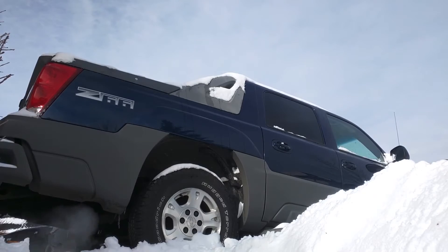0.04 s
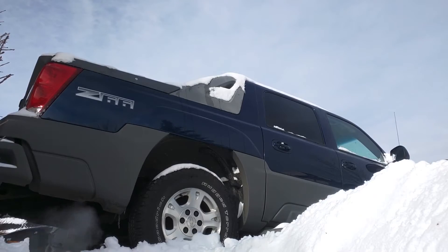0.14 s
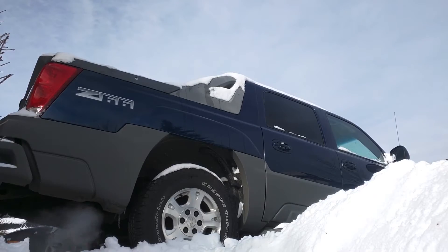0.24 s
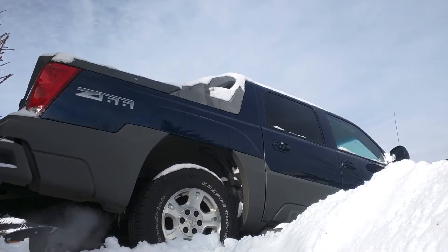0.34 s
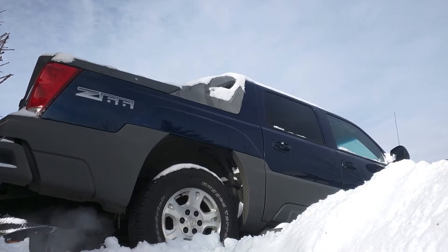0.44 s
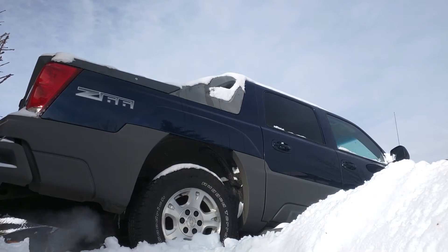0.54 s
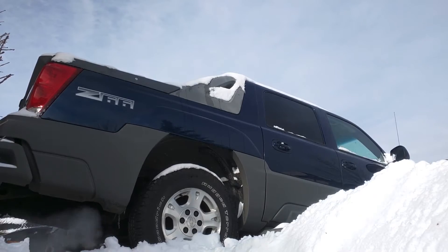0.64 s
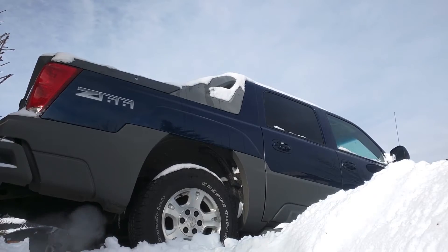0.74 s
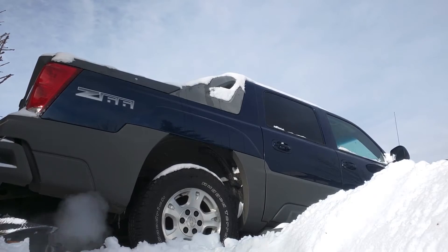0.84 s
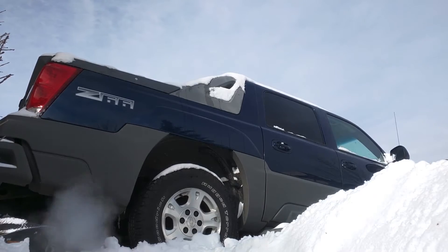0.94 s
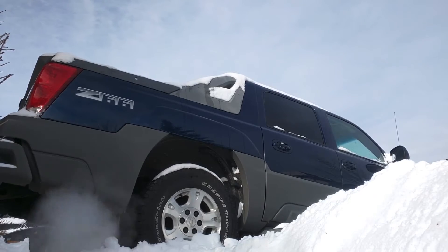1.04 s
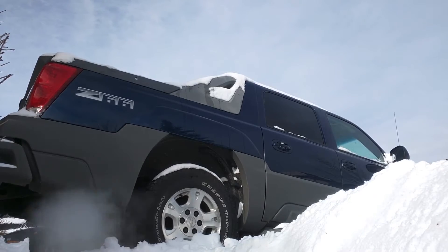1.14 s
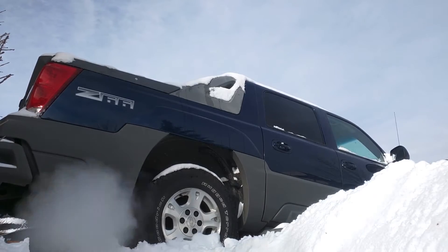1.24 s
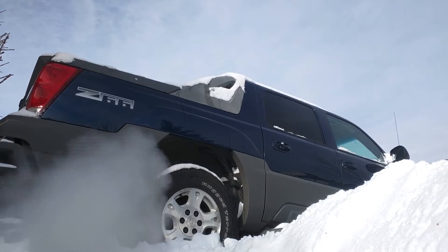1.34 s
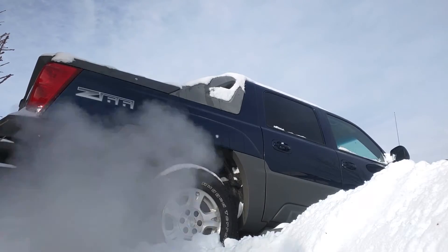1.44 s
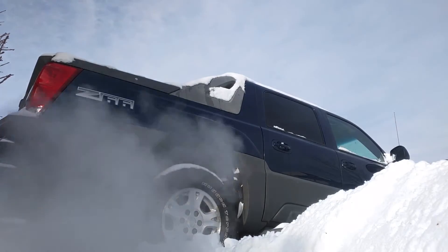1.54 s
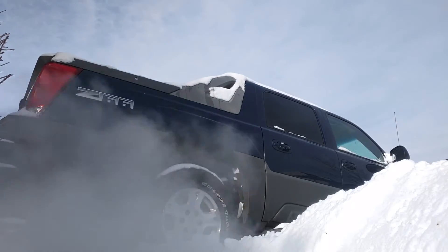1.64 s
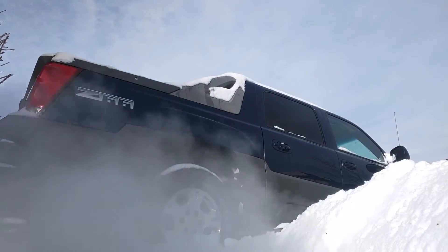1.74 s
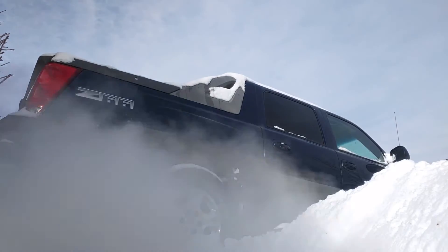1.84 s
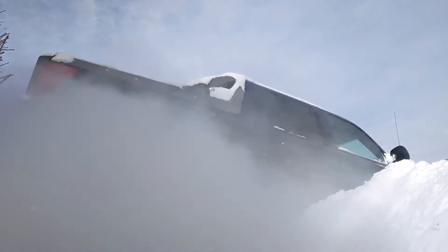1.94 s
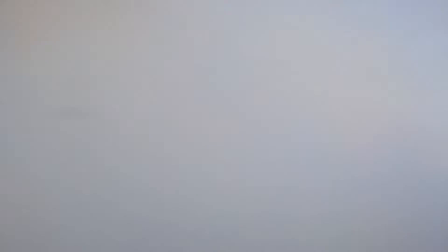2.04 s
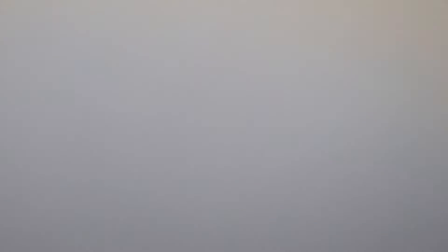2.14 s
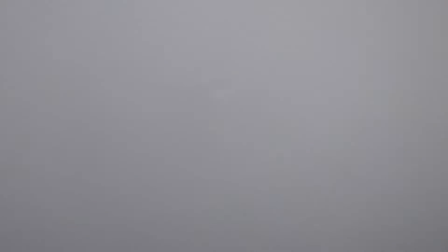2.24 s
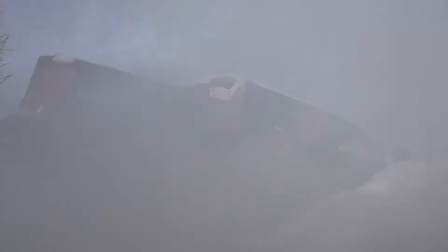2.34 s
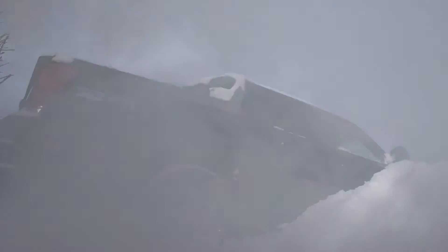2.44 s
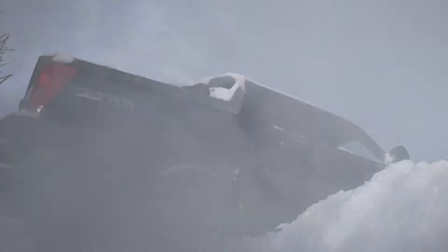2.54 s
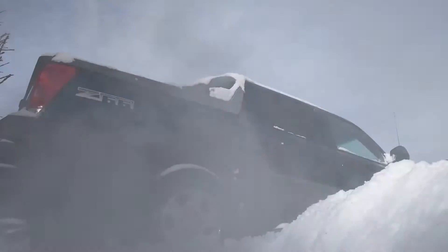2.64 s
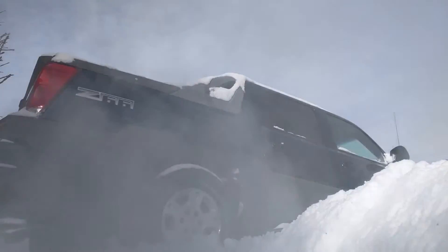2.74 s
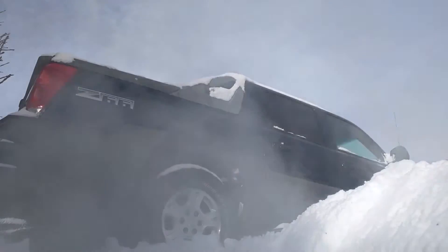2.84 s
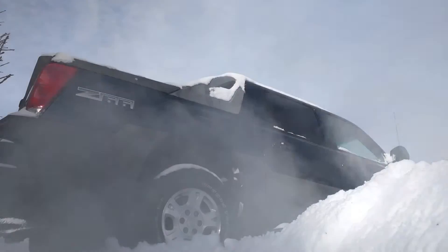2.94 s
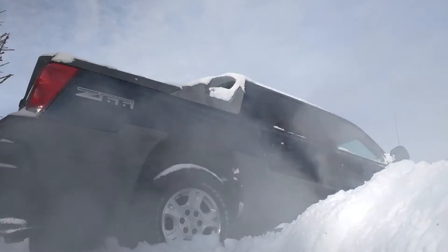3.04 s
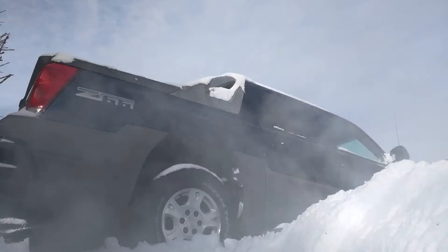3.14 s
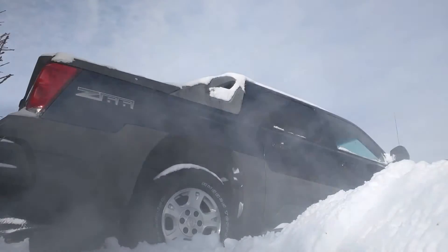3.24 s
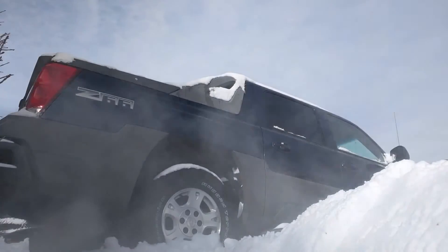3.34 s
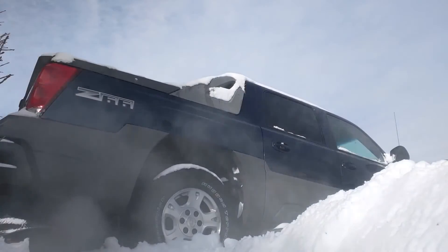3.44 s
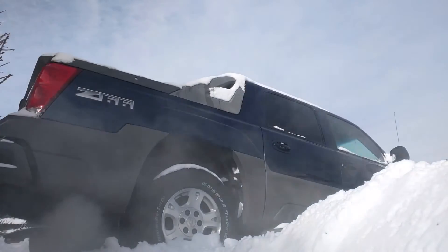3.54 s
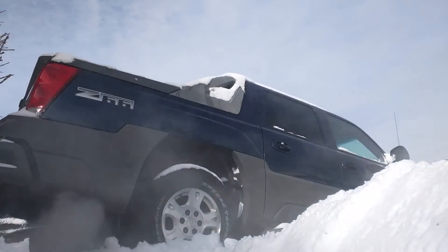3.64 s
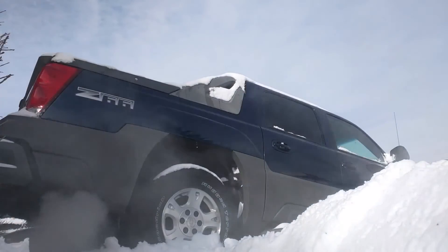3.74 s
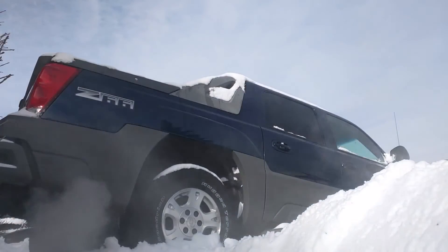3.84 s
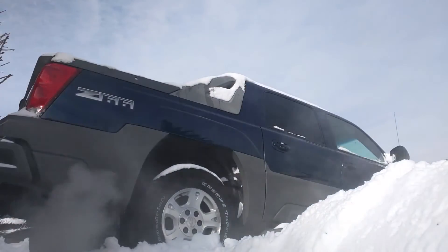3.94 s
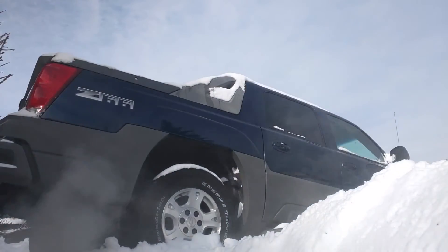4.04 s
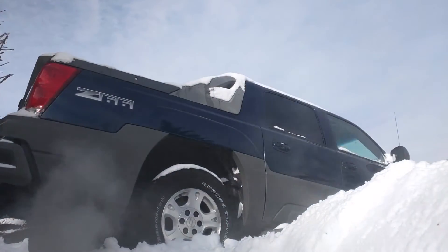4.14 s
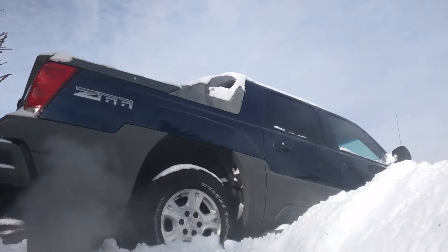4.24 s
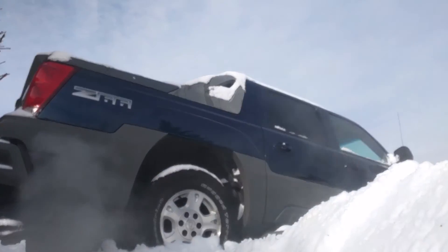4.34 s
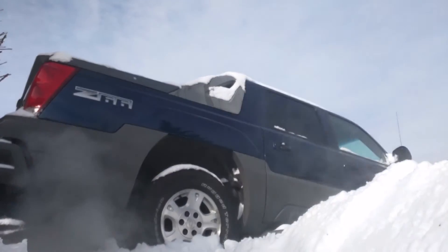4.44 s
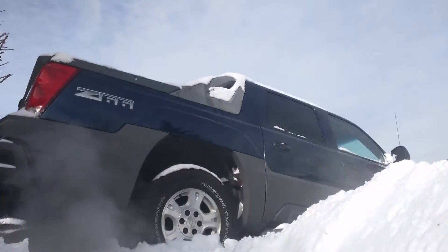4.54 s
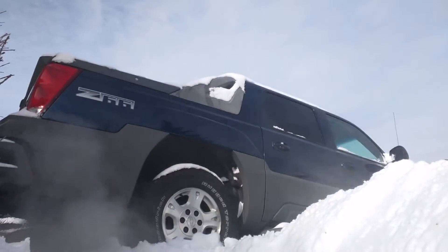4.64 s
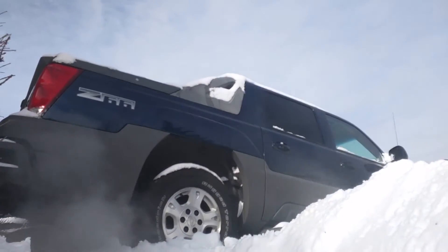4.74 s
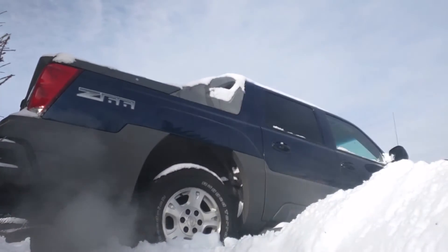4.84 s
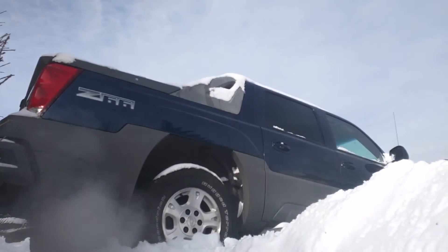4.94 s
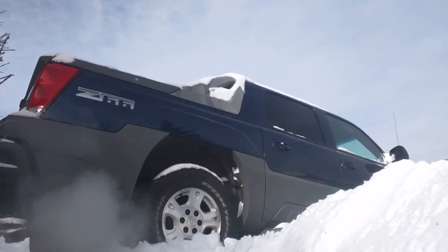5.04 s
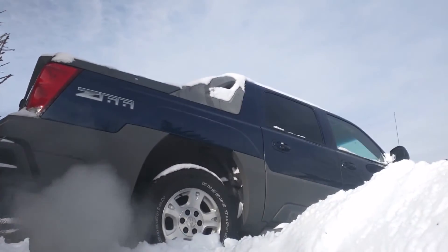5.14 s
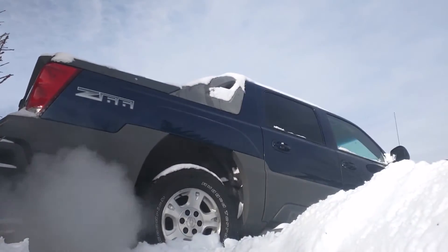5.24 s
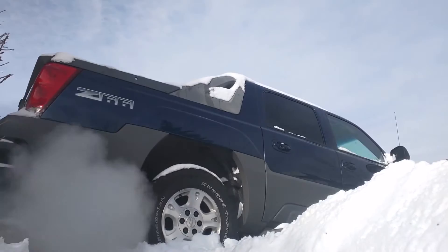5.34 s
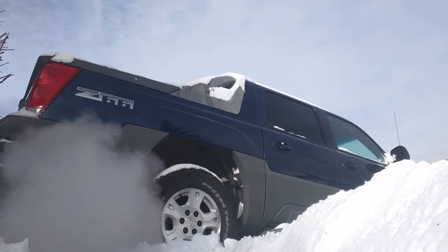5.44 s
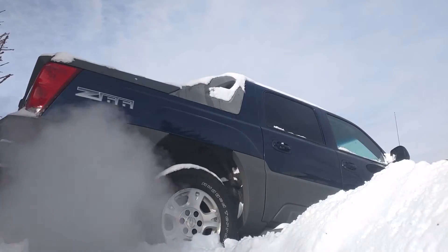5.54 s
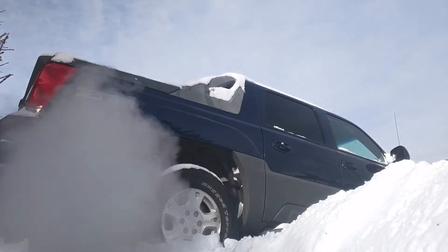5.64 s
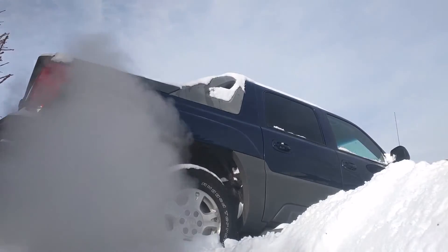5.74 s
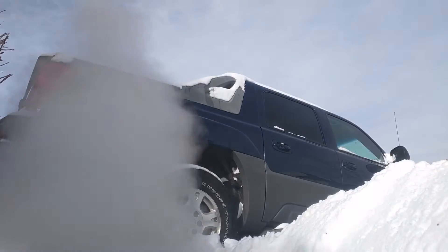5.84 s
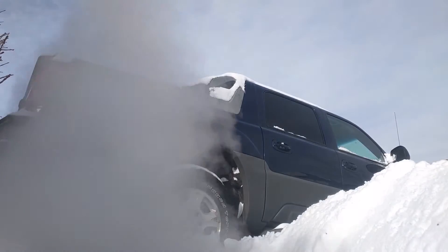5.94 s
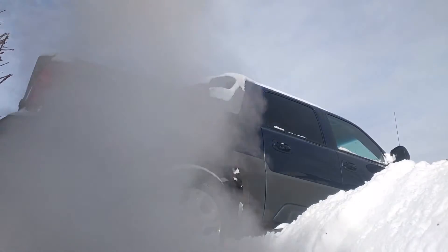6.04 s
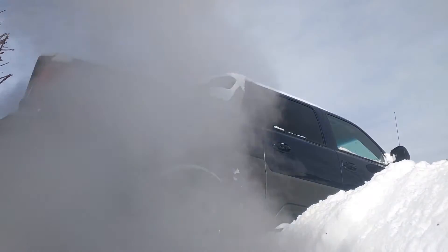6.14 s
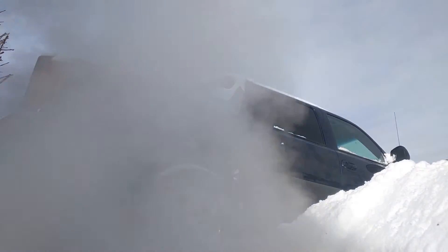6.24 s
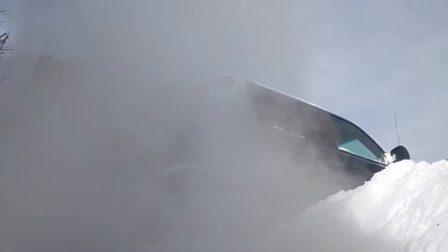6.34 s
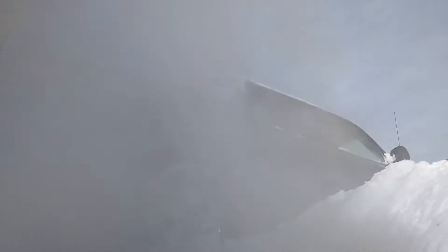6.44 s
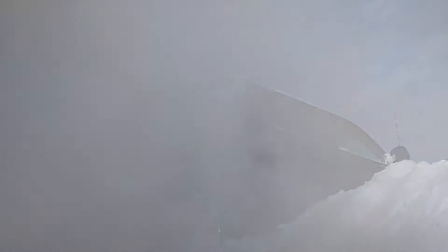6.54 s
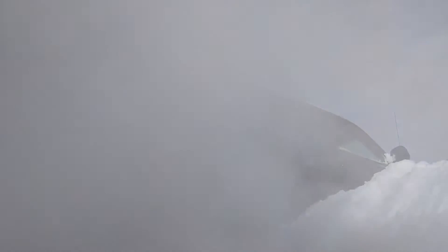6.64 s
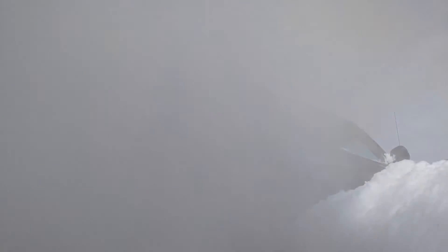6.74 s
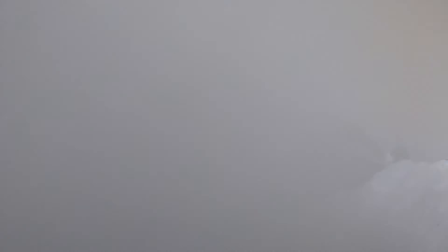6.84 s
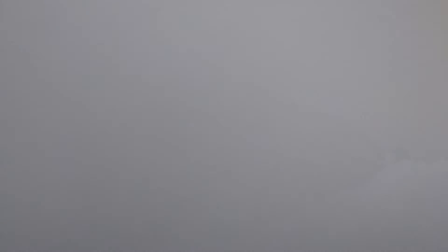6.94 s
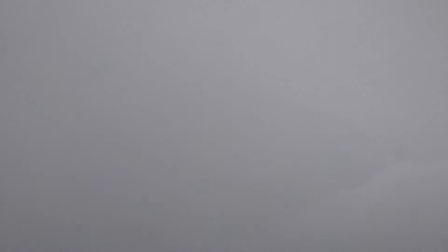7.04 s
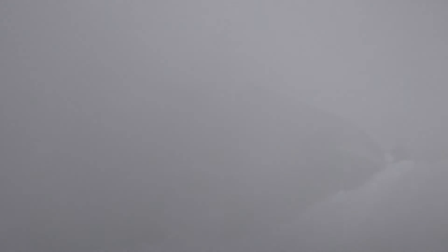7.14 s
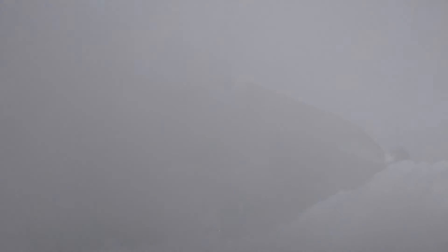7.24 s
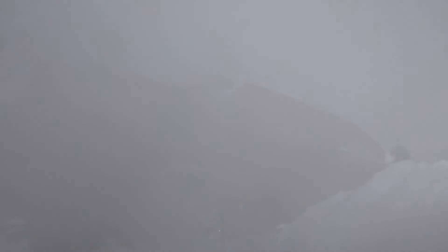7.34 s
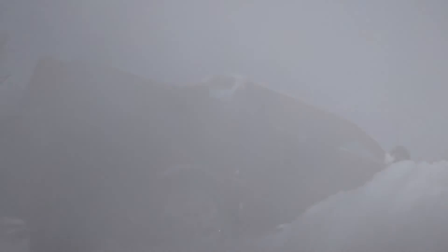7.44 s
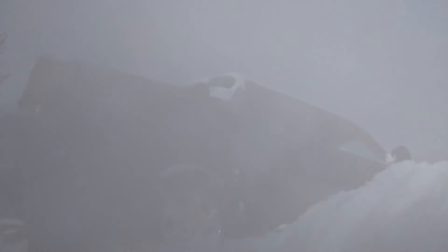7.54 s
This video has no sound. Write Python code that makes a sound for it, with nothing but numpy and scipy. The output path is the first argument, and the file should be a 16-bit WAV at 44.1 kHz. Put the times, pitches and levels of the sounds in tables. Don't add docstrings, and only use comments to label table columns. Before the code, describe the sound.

Mono, outdoors in deep snow, a low microphone right by a large V8's tailpipe. From 0 to 0.9 s it idles slowly, with uneven low throbs, valve clatter and faint hiss. A stab at 0.9 s lifts it sharply; a fuller one at 1.3 s makes a thick bark, and another at 1.8 s pushes to a raspy roar peaking near 2.15 s. Exhaust gusts rumble and buffet, tyre-thrown snow hisses, and ice grains tick brightly from 2.1 to 2.5 s, thinning by 3 s. Fuel pops crackle from 2.2 to 2.9 s as revs fall, booming down to a quiet clattering lope around 4.3 s. Light throttle at 4.6 s and firmer at 5.1 s raise it again; a tonal whine sings around 5.7-6 s. The last hard press at 6.25 s drives a hissing roar to 6.8 s, then revs drop with scattered pops and rolling low buffeting, still running at 7.6 s.

```python
import sys
import numpy as np
from scipy import signal
from scipy.io import wavfile
from scipy.ndimage import uniform_filter1d

SR = 44100
rng = np.random.default_rng(int(sys.argv[2]) if len(sys.argv) > 2 else 0)


def volts(x):
    e = np.asarray(x, float) / 20
    return 10 ** e


def master_out(mix):
    frames = np.transpose(np.atleast_2d(mix))
    ceiling = np.clip(frames, -1, 1)
    pcm = np.round(ceiling * 32767).astype(np.int16)
    wavfile.write(sys.argv[1], SR, pcm)


N = 334719
STEP = 64


def control_s():
    return np.arange(0, N + STEP, STEP) / SR


def fine(control):
    return np.interp(np.arange(N) / SR, control_s(), control)


def bump(s, half_s):
    return np.exp(-((control_s() - s) / half_s) ** 2)


def ramp(s, rise_s, hold_s, fall_s):
    corners_s = np.cumsum(np.abs([s + 1, rise_s, hold_s, fall_s])) - 1
    return np.interp(control_s(), corners_s, [0, 1, 1, 0])


def evened(x):
    return x / np.sqrt(np.mean(x ** 2) + 1e-20)


def steady(x, span_s=0.15):
    size = int(span_s * SR)
    power = uniform_filter1d(uniform_filter1d(x ** 2, size), size)
    return x / np.sqrt(abs(power) + 1e-20)


def drift(hz):
    return evened(signal.sosfilt(signal.butter(2, hz, fs=SR, output="sos"), rng.standard_normal(N)))


def read(points, hz):
    f, value = np.transpose(points)
    return np.interp(np.log(hz + 1), np.log(f + 1), value)


def modes_db(modes, hz, shelf_db):
    power = sum(volts(2 * db) / (1 + (2 * (hz - f) / w) ** 2) ** 2 for f, w, db in modes)
    return 10 * np.log10(power + volts(2 * shelf_db))


def colour(x, db_at):
    size = 2 ** 14
    gain_db = np.maximum(db_at(abs(np.fft.fftfreq(size, 1 / SR))), -100)
    log_gain = np.log(volts(gain_db))
    taps = np.fft.ifft(np.exp(np.conj(signal.hilbert(log_gain)))).real[:size // 2]
    return signal.oaconvolve(x, taps)[:N]


def coloured_noise(points):
    return colour(rng.standard_normal(N), lambda hz: read(points, hz))


def split(x, kind):
    return signal.sosfilt(signal.butter(4, 660, kind, fs=SR, output="sos"), x)


def speed(per_sample=True):
    # (time [s], cycle rate [Hz])
    crank_speed = [(0, 6.65), (.87, 6.65), (1.01, 12.5), (1.14, 14), (1.29, 14.8), (1.49, 22), (1.61, 23.5),
                   (1.85, 21.2), (1.96, 26.1), (2.15, 31.8), (2.83, 19.1), (4.3, 7.6), (4.95, 9.4),
                   (5.36, 16.5), (5.68, 19.95), (6.3, 24.3), (6.79, 31.4), (7.59, 17.9)]
    s, hz = np.transpose(crank_speed)
    slow_hz = np.exp(np.interp(control_s(), s, np.log(hz)))
    return fine(slow_hz) if per_sample else slow_hz


def crank():
    return np.cumsum(speed() * (1 + .004 * drift(hz=6))) / SR


def load():
    # (start [s], hold [s], depth [0-1])
    pedal = [
        (.88, 0.16, 0.82),
        (1.29, 0.15, 1),
        (1.817, 0.23, 0.91),
        (4.55, 0.55, 0.28),
        (5.103, 0.34, 0.72),
        (5.79, 0.18, 0.3),
        (6.24, 0.41, 0.93),
    ]
    press_s, lift_s = 0.072, 0.061
    full_coast = 0.43
    speed_hz = speed(False)
    loss = -uniform_filter1d(np.gradient(np.log(speed_hz), control_s()), size=40)
    braking = np.clip((speed_hz - 6.6) / 7, 0, 1)
    pull = sum(depth * ramp(s, press_s, hold_s, lift_s) for s, hold_s, depth in pedal)
    return np.clip(pull, 0, 1), np.clip(loss / full_coast, 0, 1) * braking


def flow():
    # (time [s], flow [dB])
    gas_flow = [(0, -38), (.9, -38.5), (.94, -28.5), (1.3, -30.5), (1.37, -22.5), (1.58, -24.5),
                (1.75, -30.5), (1.85, -31), (1.9, -21.5), (2.63, -26), (2.7, -30.5), (3.15, -38),
                (4.4, -41.5), (5, -34.5), (5.75, -21), (6.15, -24), (7.05, -21), (7.59, -31)]
    # (level at -40 dB flow [dB], slope [dB/dB])
    follow = [
        (-34.5, 0.6083),
        (-49, 0.7286),
        (-58.5, 0.58),
    ]
    # (start [s], rise [s], hold
    # [s], extra hiss [dB], extra spray [dB])
    jets = [(-.02, 0.0084, 0.99, 7.5, 3), (0.882, 0.13, 0.13, 6, 3), (1.305, 0.026, 0.2, 3.5, 8),
            (1.846, 0.07, 0.35, 2, 11), (2.308, 0.088, 0.059, 7.5, 7), (3.997, 0.37, .62, 3.5, .5),
            (4.982, 0.084, 0.26, 5, 3.5), (5.404, .05, 0.64, -2, 1), (6.13, 0.22, 0.4, 1, 6),
            (6.878, 0.12, .14, 7, 2.5), (7.225, 0.064, 0.12, 4.5, 0), (4.144, .03, .03, 2, 3)]
    # (time [s], extra bark [dB])
    fuel_pops = [(2.21, 1), (2.29, 4.5), (2.36, 4.5), (2.401, 8.5), (2.445, 5.5), (2.56, 6), (2.638, 8.5),
                 (2.81, 3.5), (6.8, -0.5), (7.019, 3.5), (2.89, 4), (7.35, 2), (7.46, 3.5)]
    # (time [s], half length [s], low bark [dB])
    chest = [
        (1.18, 0.12, 5),
        (2.984, 0.13, 5),
        (3.783, 0.11, 6),
        (5.31, 0.23, 4.5),
        (5.77, 0.14, -7.5),
        (7.318, 0.23, 3.5),
    ]
    jet_fall_s, pop_s = 0.054, 0.014
    gas_db = np.interp(control_s(), *np.transpose(gas_flow))
    low, tip, spray = (db + slope * (gas_db + 40) for db, slope in follow)
    pops = sum(db * bump(s, pop_s) for s, db in fuel_pops)
    low = low + sum(db * bump(s, half_s) for s, half_s, db in chest)
    low = low - 23 * load()[0] * np.clip((speed(False) - 24.4) / 4.9, 0, 1)
    for s, rise_s, hold_s, tip_db, spray_db in jets:
        jet = ramp(s, rise_s, hold_s, jet_fall_s)
        tip = tip + tip_db * jet
        spray = spray + spray_db * jet
    return [fine(db) for db in (low + pops, gas_db + pops, tip + 0.77 * pops, spray)]


def gusts():
    # (time [s], half length [s], level [dB])
    puffs = [
        (0.993, 0.078, -22.5),
        (1.38, 0.15, -28),
        (1.633, 0.16, -19.5),
        (2.073, 0.16, -19.5),
        (2.558, 0.35, -22.5),
        (2.937, 0.16, -28),
        (5.026, 0.41, -37),
        (6.619, 0.13, -32),
        (7.157, 0.8, -23.5),
    ]
    # (frequency [Hz], density [dB/Hz])
    buffet = [(8, -28), (20, -9.5), (45, 0), (120, -17), (300, -13), (800, -62)]
    cloud = fine(volts(-33) + sum(volts(db) * bump(s, half_s) for s, half_s, db in puffs))
    return cloud * volts(1.68 * drift(hz=21.3)) * evened(coloured_noise(buffet))


def ice():
    # (time [s], peak [dB])
    grains = [(1.6806, -25), (1.734, -26), (1.8902, -36), (2.1032, -7), (2.1351, -19), (2.155, -11.5),
              (2.172, -9.5), (2.203, -12.5), (2.2389, -29), (2.2484, -21), (2.2898, -22), (2.3132, -19),
              (2.3786, -21), (2.4274, -32), (2.4629, -20), (2.4913, -20), (2.4988, -20), (2.5197, -24),
              (2.6909, -43), (2.7332, -19), (2.7746, -19), (2.8917, -23), (2.9109, -37), (2.9637, -47),
              (2.9822, -32), (7.0958, -28)]
    grains_per_s = np.interp(np.arange(N) / SR, [2.05, 2.15, 2.5, 2.7], [0, 300, 140, 0])
    size = volts(-35.5 + 6.3 * np.minimum(rng.exponential(1, N), 3))
    hits = size * (rng.random(N) < grains_per_s / SR) * rng.choice([-1, 1], N)
    decay = np.exp(-np.arange(60) / SR / .0003)
    for s, db in grains:
        burst = rng.standard_normal(60) * decay
        hits[round(s * SR):][:60] += volts(db + 2.5) * burst / abs(burst).max()
    return signal.sosfilt(signal.butter(2, [4300, 15600], "band", fs=SR, output="sos"), hits)


def slow_share():
    return np.clip(1.3 - speed() / 14, .35, .9)


def snow_spray():
    # (frequency [Hz], density [dB/Hz])
    spray_curve = [(2940, 2), (5000, -6), (7450, -8.5), (10500, -6.5), (15100, -24), (15900, -17),
                   (16200, -36)]
    # (frequency [Hz], density [dB/Hz])
    air_curve = [(2940, -38), (5000, -15), (7020, 10), (10200, -28), (11400, 3), (15100, 3), (16200, -15)]
    spray_db, share = flow()[3], slow_share()
    spray = steady(volts(0.82 * drift(hz=25)) * coloured_noise(spray_curve))
    air = evened(coloured_noise(air_curve))
    return volts(spray_db + 3.44) * np.sqrt(1 - share) * spray + volts(spray_db - 9) * np.sqrt(share) * air


def clatter(turns):
    # (place in the cycle [firings], level [dB])
    valves = [(1.15, -2.5), (3.05, 2.5), (4.6, -9), (6.15, -2)]
    # (frequency [Hz], width [Hz], level [dB])
    head = [(1960, 95, -6.5), (2470, 480, -6), (3044, 130, -2.5), (3490, 260, 2.5), (3738, 61, 7),
            (4440, 530, -6), (5200, 400, -19), (5700, 500, -14), (6800, 3700, -20), (7640, 300, -19.5),
            (9650, 1100, -22), (12200, 1100, -26)]
    out = np.zeros(N)
    for place, db in valves:
        since_s = ((8 * turns - place) % 8) / (8 * speed())
        knock = 0.08 + since_s * np.exp(-since_s / 0.0058) / 0.0064
        knock = knock * volts(db + 2.2 * drift(hz=15))
        modes = np.array(head) + 2.5 * rng.standard_normal((len(head), 1)) * [10, 0, 1]
        out += colour(knock * rng.standard_normal(N),
                      lambda hz: modes_db(modes, hz, shelf_db=-45) - 40 * (hz < 1700))
    return steady(out)


def hiss(turns):
    # (frequency [Hz], density [dB/Hz])
    tip_curve = [(880, -31.5), (1500, -10.5), (1850, -5), (2170, -7.5), (3080, -8), (3690, -6), (4420, -11),
                 (5570, -14), (6970, -25), (9000, -71), (11700, -80), (19800, -120)]
    tip_db, share = flow()[2], slow_share()
    tip = steady(volts(1.3 * drift(hz=31.4)) * coloured_noise(tip_curve))
    return volts(tip_db - 3.0) * (np.sqrt(share) * clatter(turns) + np.sqrt(1 - share) * tip)


def singing(turns):
    # (time [s], half length [s], cycle order [-], rms [dB])
    sung = [(0.395, 0.68, 40, -44.5), (2.01, 0.088, 19, -26.5), (1.934, 0.068, 24, -27),
            (5.2, 0.11, 19, -31.5), (5.415, .15, 24, -30), (5.717, 0.15, 40, -22.5), (5.9, 0.16, 43, -27),
            (5.895, 0.11, 21, -25), (5.97, 0.27, 37, -24.5), (6.282, 0.13, 16, -28),
            (6.632, 0.11, 19, -27.5)]
    out = np.zeros(N)
    for s, half_s, order, db in sung:
        out += fine(volts(db) * bump(s, half_s)) * np.sin(2 * np.pi * round(order) * turns)
    return np.sqrt(2) * out


def throb(turns):
    # (cycle order [-], level at 15 cycles/s [dB], speed slope [dB/octave],
    # added by pull [dB], added by coasting [dB])
    main_orders = [(1, -35, 6.5, 7.5, 10), (3, -46.5, 4.5, 19.5, 23.5), (5, -35, -5, 12.5, -3.5),
                   (6, -38, 7.5, 6.5, 3), (8, -31, 3, 11.5, -14), (11, -53, 18, 19.5, -3)]
    # (frequency [Hz], gain [dB])
    boom = [(15, -2.5), (60, 4.5), (95, -7), (125, 3), (150, -8.5), (220, 4), (270, -2.5), (340, -20)]
    # (time [s], half length [s], cycle order [-], extra [dB])
    swells = [(1.71, .08, 3, -1), (5.68, 0.13, 11, 15.5), (7.42, 0.13, 6, 14), (3.1, 0.039, 6, 6),
              (4.048, 0.18, 5, 6), (4.5, 0.28, 8, 2), (1.377, 0.1, 3, 7.5), (1.94, .07, 3, 2),
              (2.23, 0.078, 3, -5.5), (2.684, 0.23, 5, 19.5), (2.9, .07, 8, 10), (3.55, 0.15, 8, 13),
              (5.485, 0.034, 8, -10), (5.85, 0.065, 8, 8), (6.36, 0.25, 11, 2), (6.916, 0.11, 3, -8)]
    # (cycle order [-], level [dB])
    weak_orders = [(2, -16), (4, -12), (7, -7), (9, -14), (10, -14), (12, -16), (13, -9), (16, -6)]
    # (frequency [Hz], gain [dB])
    low_pipe = [(15, 4), (60, 10), (95, -1), (125, 5), (155, -31), (215, 4.5), (260, -14), (330, -78),
                (500, 6)]
    slow_hz, (pull, coast), low_db = speed(False), load(), flow()[0]
    out = np.zeros(N)
    for k, db, octave_db, pull_db, coast_db in main_orders:
        k = round(k)
        level_db = db + octave_db * np.log2(slow_hz / 15) + pull_db * pull + coast_db * coast
        level_db += read(boom, k * slow_hz)
        level_db += sum(extra_db * bump(s, half_s) for s, half_s, order, extra_db in swells
                        if round(order) == k)
        gain = volts(fine(level_db) + 1.08 * drift(hz=2.15))
        out += gain * np.sin(2 * np.pi * (k * turns + rng.random()))
    for k, db in weak_orders:
        pipe = fine(read(low_pipe, k * slow_hz)) + 0.67 * drift(hz=2.7)
        out += volts(low_db + db + pipe - 5) * np.sin(2 * np.pi * (k * turns + rng.random()))
    return np.sqrt(2) * out


def blows(turns, spread_db):
    cylinder_db = [-3, -10, -9, -6, -11, -8, -13, 0]
    firing = (8 * turns + .35).astype(int)
    chance = rng.standard_normal(2000)[firing]
    return volts(np.array(cylinder_db)[firing % 8] + spread_db * chance)


def lope(turns):
    firing = np.floor(8 * turns + .35)
    clicks = np.diff(firing, prepend=0) * blows(turns, spread_db=2.2)
    t = np.arange(2500) / SR
    runs = rng.standard_normal((8, 2500)) * t * np.exp(-t / .005)
    runs /= np.linalg.norm(runs, axis=1)[:, None]
    rings = np.hanning(560) * np.sin(2 * np.pi * (405 * t[:560] + rng.random((8, 1))))
    smeared, rung = np.zeros(N), np.zeros(N)
    for k in range(8):
        own = firing % 8 == k
        smeared += signal.oaconvolve(clicks ** .6 * own, runs[k])[:N]
        rung += signal.oaconvolve(clicks * own, rings[k])[:N]
    return evened(rung) + 3.5 * evened(smeared), smeared


def roar(turns):
    bank_db = [-4, -10, -9, -5, -11, -5, -9, -10]
    loud_orders = [13, 16, 19, 21, 37, 40]
    k, cycle = np.arange(12, 80), np.arange(4097) / 4096
    heights_db = np.array(bank_db)[k % 8] + 7 * np.isin(k, loud_orders)
    heights = volts(heights_db + 2 * rng.standard_normal(len(k)))
    wave = heights @ np.sin(2 * np.pi * (k[:, None] * cycle + rng.random((len(k), 1))))
    return evened(np.interp(turns % 1, cycle, wave)) * volts(0.8 * drift(hz=45))


def pipe_db(hz):
    # (frequency [Hz], width [Hz], level [dB])
    pipe_modes = [(130, 23, 3), (214, 17, -3), (262, 61, 1), (395.5, 111, 6), (502, 42, -12),
                  (514, 305, -8), (810, 104, -2.5), (981, 360, -12), (1167, 18, -9), (1408, 230, -10)]
    cut_off = (1 + (hz / 1620) ** 24) * (1 + (110 / (hz + 1)) ** 6)
    return modes_db(pipe_modes, hz, shelf_db=-18) - 10 * np.log10(cut_off)


def bark(turns):
    turbulence = (.38, .22, .36, .26)
    base, by_pull, by_coast, idle = turbulence
    speed_hz, (pull, coast) = speed(), map(fine, load())
    ragged = np.where(speed_hz > 8.2, base + by_pull * pull + by_coast * coast, idle)
    fused = np.clip((speed_hz - 11) / 7, 0, 1)
    comb = roar(turns) * np.sqrt(70 * speed_hz / (SR / 2))
    puff_size = 2.7 + uniform_filter1d(blows(turns, spread_db=10.5), 300)
    puffs = steady(puff_size * rng.standard_normal(N))
    out = np.zeros(N)
    for blow, db, kind in zip(lope(turns), flow(), ("low", "high")):
        clean = np.sqrt(1 - fused) * steady(blow) + np.sqrt(fused) * comb
        drive = np.sqrt(1 - ragged) * clean + np.sqrt(ragged) * puffs
        out += volts(db + 0.83) * steady(split(colour(drive, pipe_db), kind), span_s=0.12)
    return out


def scene():
    turns = crank()
    surroundings = gusts() + ice() + snow_spray()
    engine = hiss(turns) + singing(turns) + throb(turns) + bark(turns)
    return (surroundings + engine)[None]


def roll_off(x):
    return signal.sosfilt(signal.butter(12, 16480, fs=SR, output="sos"), x)


def record(dry):
    overloaded = 0.68 * np.tanh(dry / 0.85)
    edge = signal.firwin(511, 15850, window=("kaiser", 8), fs=SR)[None]
    return roll_off(signal.oaconvolve(overloaded, edge, "same"))


dry = scene()
out = record(dry)
master_out(out)
```